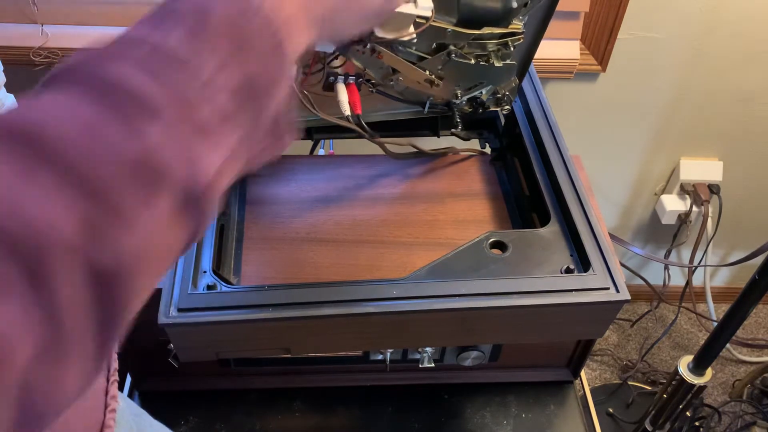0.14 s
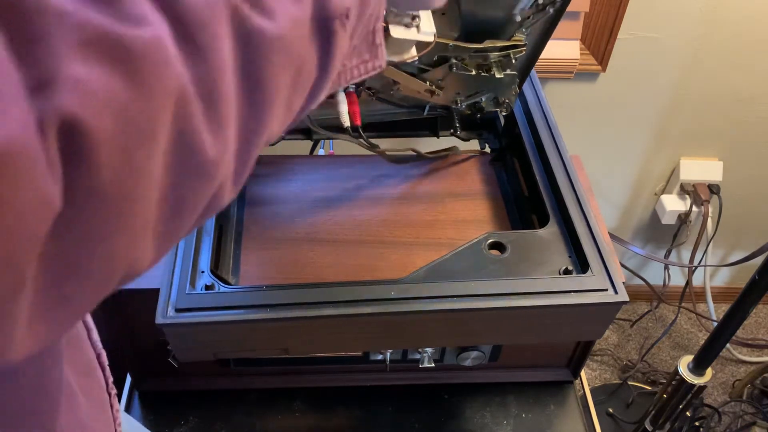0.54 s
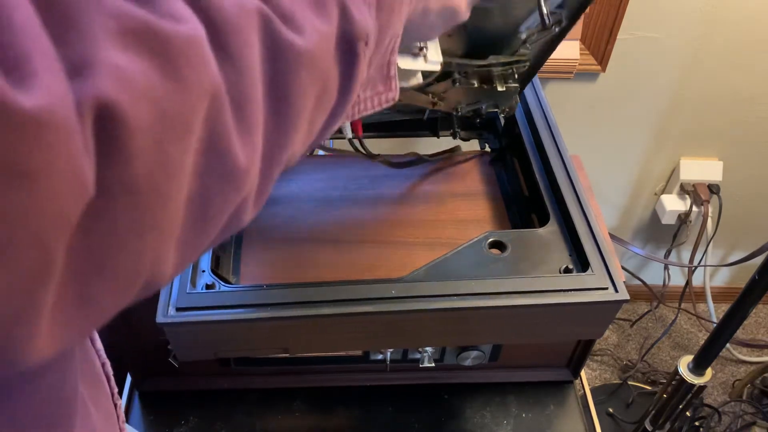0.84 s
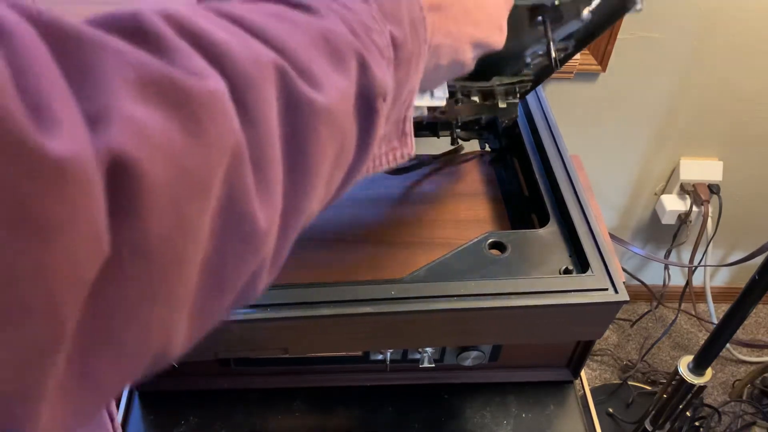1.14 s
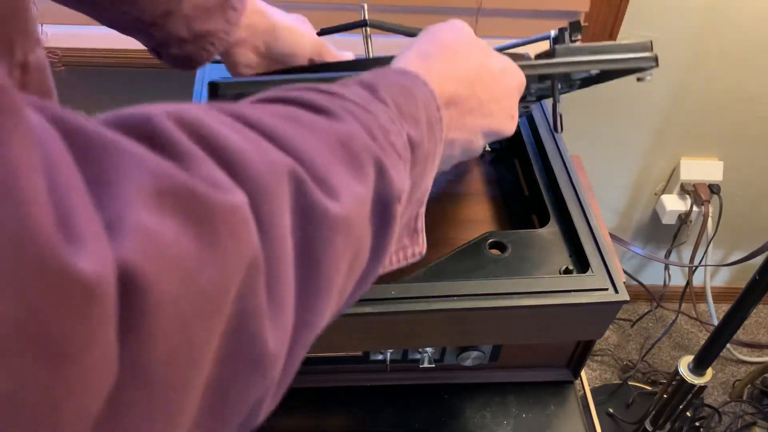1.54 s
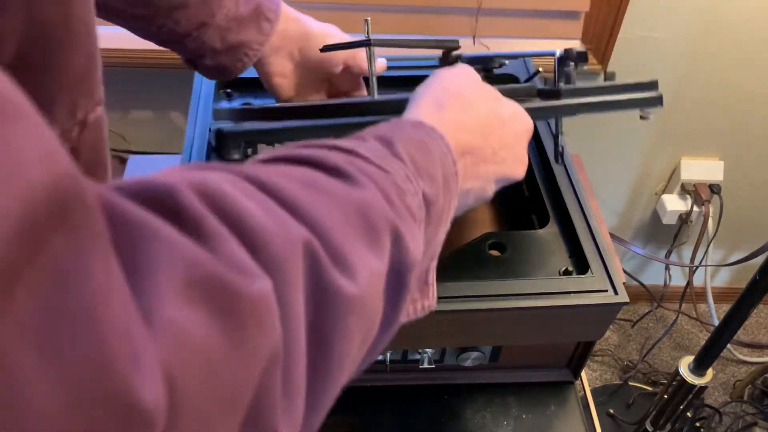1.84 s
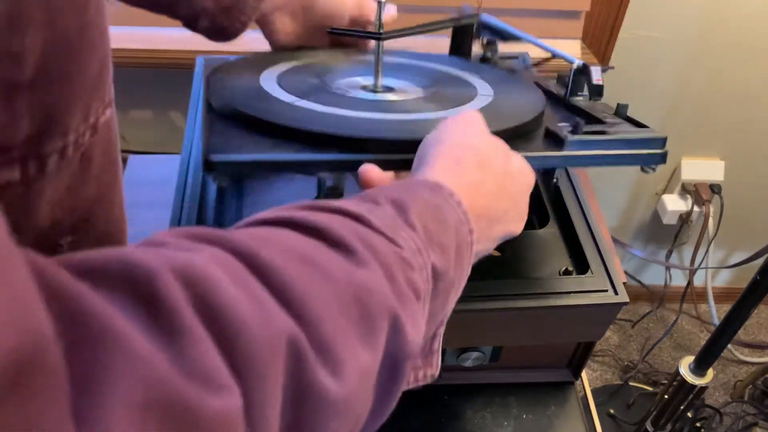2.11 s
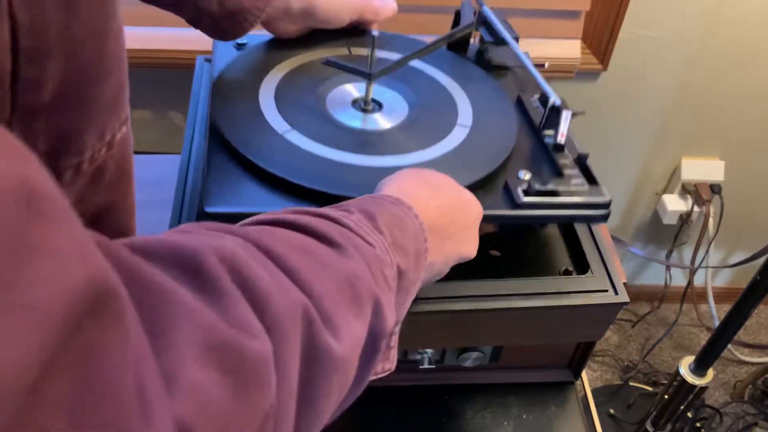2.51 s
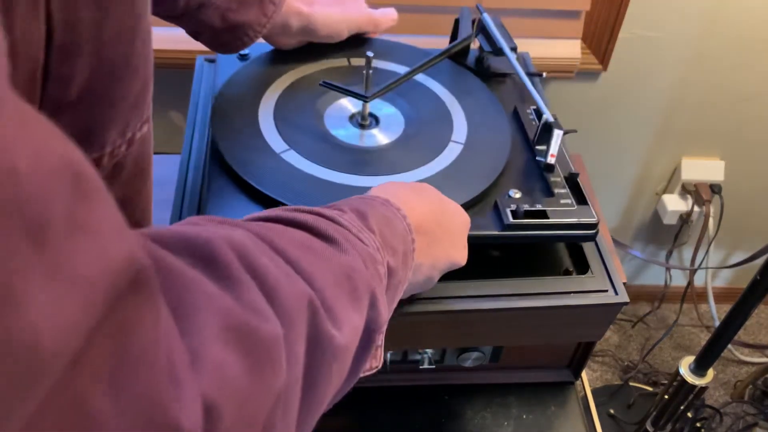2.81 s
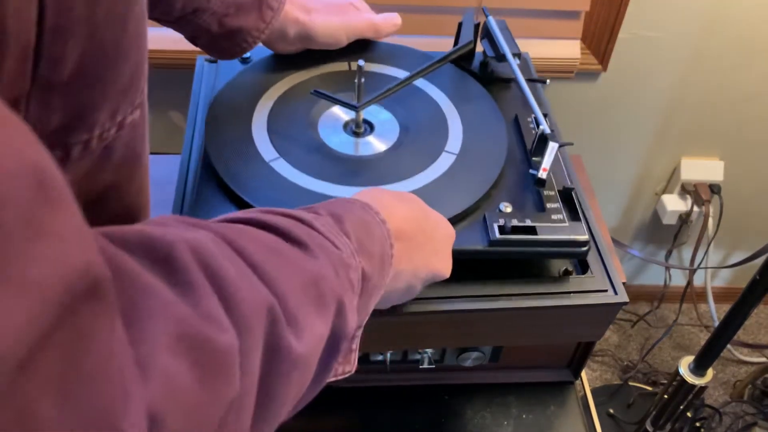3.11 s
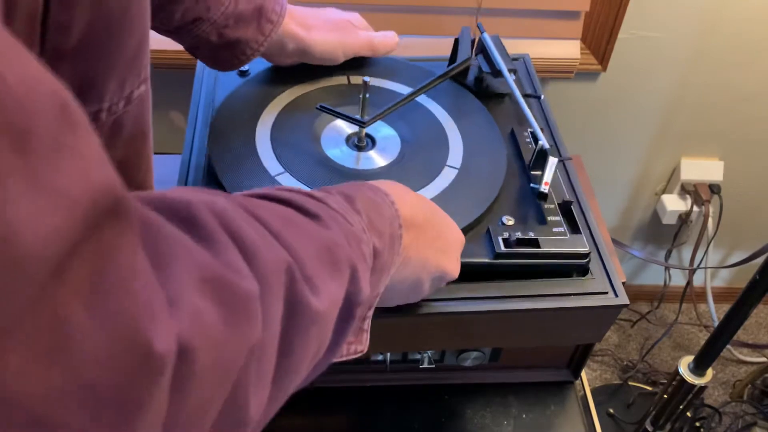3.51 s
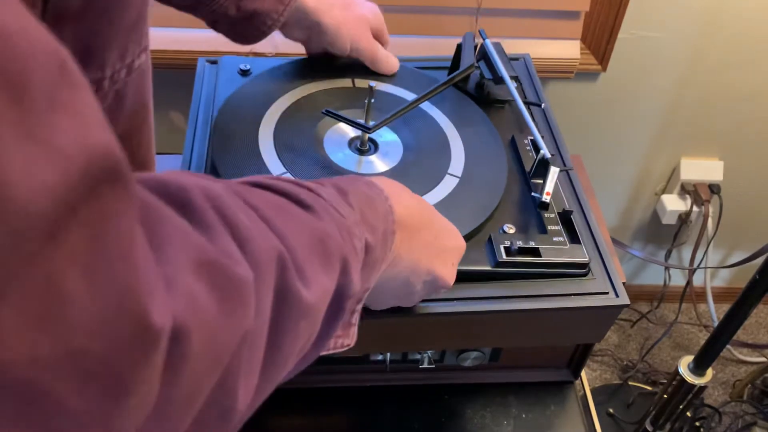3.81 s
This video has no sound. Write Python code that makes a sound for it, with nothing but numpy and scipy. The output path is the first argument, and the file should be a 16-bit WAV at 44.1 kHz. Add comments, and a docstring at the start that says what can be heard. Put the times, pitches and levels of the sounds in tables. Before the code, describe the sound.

A record player deck is handled close to the microphone: scattered clicks and rubs at first, a firm knock midway, then a dense run of clunks and scrapes as it settles into its wooden cabinet in a quiet room.

```python
"""A record player deck is turned over by hand and lowered into a wooden cabinet in a quiet room.
Throughout, filtered noise makes a low rumble and faint hiss, and a wavering sine makes mains hum.
From the start, loose parts click, the steel plate knocks and rings, and fingers and edges rub:
short blows and grainy noise set off fading tones of plate and cabinet, with a noisy hiss on top.
Near 2.4 s the deck comes down, which changes the offset between two close microphone ports."""
import sys
import numpy as np
from scipy import signal
from scipy.fft import rfft, irfft, next_fast_len
from scipy.io import wavfile
from scipy.ndimage import uniform_filter1d

SR = 44100
rng = np.random.default_rng(int(sys.argv[2]) if len(sys.argv) > 2 else 0)


def wav_record(signal):
    """Record a signal, one row per channel, as 16-bit PCM in the file named by sys.argv[1]."""
    frames = np.transpose(np.atleast_2d(signal))
    bounded = np.clip(frames, -1, 1)
    # unit amplitude maps onto the largest positive 16-bit level
    quanta = np.round(bounded * 32767).astype(np.int16)
    wavfile.write(sys.argv[1], SR, quanta)


def gain_from_db(level_db):
    """Convert decibel levels to linear amplitude factors (20 dB per decade)."""
    decades = np.asarray(level_db, float) / 20
    return 10 ** decades


N = 174195  # length in samples, just under 4 s

# Tones (modes) of the steel plate. Each row: pitch in Hz, relative level in dB, and the seconds
# to fade by 60 dB; each blow or rub shifts these a little and scales the fading time.
PLATE = [(718.7, -3, 0.27), (874, 5.5, 0.057), (1010, 2.5, 0.085), (1068, -3, 0.15), (1180, -0.5, 0.091),
         (1297, -3.5, 0.078), (1445, -8, 0.19), (1609, 0, 0.068), (1800, 3, 0.044), (2017, -2.5, 0.067),
         (2160, -17, 0.094), (2510, -1.5, 0.04), (2640, -6, 0.088), (2670, -34, 0.11), (3400, -10, 0.028)]
# Tones of the wooden cabinet, with the same columns and the same changes.
WOOD = [(174.5, 0, 0.22), (240, 1, 0.079), (295.7, -3.5, 0.063), (364, -2, 0.085), (426, -5, 0.11),
        (490.4, -3, 0.1), (558, -3, 0.056), (635, -1, 0.058)]
PLATE_PUSH_S, WOOD_PUSH_S = 0.0001, 0.00093  # how gradually each body starts to ring


def table(points, hz):
    """Reads a value from (Hz, value) points on a log-frequency axis."""
    p = np.array(points, float)
    return np.interp(np.log(np.maximum(hz, 1)), np.log(p[:, 0]), p[:, 1])


def shape(x, gain):
    """Filters by a gain that is a function of frequency."""
    size = next_fast_len(x.shape[-1])
    hz = np.arange(size // 2 + 1) * SR / size
    return irfft(rfft(x, size) * gain(hz), size)[..., :x.shape[-1]]


def unit(x):
    """Scales to rms 1."""
    return x / np.sqrt(np.mean(x ** 2))


def peak1(y):
    """Scales so that the loudest 4 ms have rms 1."""
    return y / np.sqrt(np.max(uniform_filter1d(y ** 2, size=180)))


def fade(t, t60):
    """Decays by 60 dB in t60 seconds."""
    return np.exp(-np.log(1000) * t / t60)


def walk(rate):
    """Makes a slow random drift with spread 1, from about `rate` random values a second."""
    k = int(SR / rate)
    steps = np.repeat(rng.standard_normal(N // k + 1), k)
    return unit(uniform_filter1d(uniform_filter1d(steps, k), k)[:N])


def background():
    """Room rumble falls off into faint hiss; a sine wavers in level and phase as mains hum."""
    # Colour of the rumble. Each row: frequency in Hz, relative level in dB.
    air_colour = [(15, -48), (25, -18.5), (69, -8), (160, -3), (399, -14.5), (567, -26), (666, -26),
                  (722, -27.5), (3530, -55), (9810, -55), (11500, -57.5), (13200, -55), (15500, -65)]
    # Left-right difference of the rumble. Each row: frequency in Hz, level against the middle in dB.
    air_width = [(60, -23), (110, -23.5), (200, -10), (380, -9.5), (700, 0), (1290, -6), (2380, 0),
                 (4400, 1), (8120, -1), (15000, -1.5)]
    air_db, hum_hz, hum_db = -51, 59.5, -55
    mid = shape(rng.standard_normal(N), lambda f: gain_from_db(table(air_colour, f)))
    side = shape(rng.standard_normal(N), lambda f: gain_from_db(table(air_colour, f) + table(air_width, f)))
    stereo = (mid + side * np.array([[1], [-1]])) / mid.std()
    air = stereo * gain_from_db(air_db + 1.0 * walk(0.57))
    cycle = 2 * np.pi * hum_hz * np.arange(N) / SR + .5 * walk(5.4)
    hum_level = gain_from_db(hum_db + 3 * walk(11))  # the hum wavers by 3 dB
    return air + hum_level * np.sqrt(2) * np.sin(cycle)


def room(x):
    """A furnished room adds a diffuse tail, shorter in the treble, alike left and right in the bass."""
    # How long the room rings. Each row: frequency in Hz, seconds to fade by 60 dB.
    ring_times = [(200, 0.67), (1000, 0.37), (3000, 0.4), (9000, 0.083)]
    # Likeness of the ports. Each row: frequency in Hz, share of the tail's power common to both.
    likeness = [(150, 1), (500, 0.31), (2000, 0.055), (8000, 0.13)]
    tail_db = -9.5
    t, tail = np.arange(SR // 2) / SR, 0
    for hz in 125 * 2. ** np.arange(8):  # one octave band after another
        octave = lambda f: np.exp(-2 * np.log2(np.maximum(f, 1) / hz) ** 2)
        band = shape(rng.standard_normal((3, len(t))), octave)
        alike = np.clip(table(likeness, hz), 0, 1)
        mixed = np.sqrt(alike) * band[0] + np.sqrt(1 - alike) * band[1:]
        tail = tail + mixed * fade(t, table(ring_times, hz))
    tail = tail * np.clip(t / 0.0013 - .3, 0, 1)  # silent for 0.4 ms, full after 1.7 ms
    return gain_from_db(tail_db) * signal.fftconvolve(x[None], tail / np.linalg.norm(tail[0]), axes=1)[:, :N]


def hiss_colour(f):
    """Treble colour of ticks and rubbing, with the narrow peaks and dips of small metal parts."""
    # Broad colour. Each row: frequency in Hz, relative level in dB.
    broad_colour = [(1470, -27), (2500, -5.5), (6110, -11), (7280, -8.5), (9080, -8), (10300, -13),
                    (11500, -12.5), (12200, -12.5), (13800, -26), (15500, -26)]
    # Resonances of the small parts. Each row: frequency in Hz, width in Hz, change in dB.
    small_parts = [(4140, 40, -12), (4640, 54, 0), (5080, 64, 0), (5200, 600, 6), (5700, 190, -2.5),
                   (8000, 150, 9.5), (9840, 210, 1)]
    resonances = sum(db * np.exp(-((f - hz) / width) ** 2) for hz, width, db in small_parts)
    return gain_from_db(table(broad_colour, f) + resonances)


def near_db(f, hz, reach_oct):
    """Modes far from the brightest one are excited less: 6 dB less at reach_oct octaves."""
    return -6 * (np.log2(np.maximum(f, 1) / hz) / reach_oct) ** 2


def ring(modes, t, extra_db, chance, push_s, held=0.8):
    """Damped modes after a push, each varied a little at random; held scales how long they ring."""
    scatter_db, detune = 2, .02  # random spread of each mode's level, and of its pitch as a share
    hz, db, t60 = np.array(modes, float).T[:, :, None]
    c = chance[:, :len(modes), None]
    level = gain_from_db(db + extra_db[:, None] + scatter_db * c[0])
    tone = np.sin(2 * np.pi * hz * (1 + detune * c[1]) * t + 9 * c[2])
    y = level * fade(t, t60 * held) * tone
    return peak1(y.sum(axis=0) * (1 - np.exp(-t / push_s)))


def rubs():
    """Grainy friction swells and fades, driving the modes of plate and cabinet, with a hiss on top."""
    # Rubbing strokes. Each row: start, strongest moment and end in seconds, plate level in dB,
    # wood and hiss levels against the plate in dB, brightest plate mode and brightest wood mode
    # in Hz, and taper (a small one gives firm edges).
    strokes = [(-.05, 0.017, 0.44, -68, 7.5, 1, 1330, 210, 0.52),
               (0.296, 0.342, 0.65, -55.5, -4.5, -37, 1160, 444, 2.2),
               (0.699, 0.801, 0.87, -57.5, -14, -14, 1350, 298, 1.17),
               (0.81, 0.879, 0.91, -53, -18, -14.5, 1180, 300, 0.56),
               (1.436, 1.456, 1.612, -53, 5, 2.5, 1800, 362, 0.74),
               (1.448, 1.496, 1.54, -46.5, 0.5, -15, 1010, 634, 0.29),
               (1.793, 1.851, 1.905, -55.5, 6, -12.5, 1540, 426, 0.85),
               (1.87, 1.911, 2.0, -63.5, 9.5, -17, 930, 440, 1.16),
               (2.176, 2.277, 2.544, -49.5, -13, -35, 1050, 440, 0.58),
               (2.194, 2.304, 2.654, -60, 7.5, -19, 1900, 376, 0.49),
               (2.529, 2.568, 2.71, -65.5, 16.5, -2.5, 1200, 288, 0.89),
               (3.127, 3.24, 3.36, -59.5, 10.5, -14, 1130, 180, 0.33),
               (3.333, 3.346, 3.418, -42.5, 2, 5.5, 1530, 443, 3.2),
               (3.28, 3.326, 3.42, -51, 1.5, -35, 1180, 443, 0.48),
               (3.415, 3.46, 4.9, -63.5, 8.5, -19, 1174, 294, 1.2),
               (3.524, 3.57, 3.65, -41.5, 4.5, -3.5, 1360, 460, 1.83),
               (3.6, 3.673, 3.74, -45, 0.5, -28, 930, 460, 1.05),
               (3.773, 3.813, 3.9, -50.5, 5, -18, 1270, 402, 1.9),
               (3.827, 3.858, 3.89, -38.5, 1.5, -13, 1160, 413, 0.48),
               (3.875, 3.875, 3.92, -45, 4.5, -36, 970, 225, 0.89)]
    plate_reach_oct, wood_reach_oct, broad_db = 0.63, 0.65, -6
    catch_per_s, catch_db, catch_spread_db = 400, 12.5, 3.5  # friction sticks, then slips
    t, out = np.arange(SR // 4) / SR, np.zeros(N + 2 * SR)
    grain = gain_from_db(2.5 * walk(150))  # roughness that wavers by 2.5 dB
    catch_level = gain_from_db(catch_db + catch_spread_db * rng.exponential(size=N).clip(0, 3))
    catches = (rng.random(N) < catch_per_s / SR) * catch_level
    grit = unit(grain * rng.standard_normal((2, N)) + catches)
    hiss = grain ** .5 * unit(shape(rng.standard_normal(N), hiss_colour))
    chance = rng.standard_normal((len(strokes), 2, 3, 16))
    for (start, top, end, db, wood_db, hiss_db, hz, wood_hz, taper), c in zip(strokes, chance):
        i, j = max(int(start * SR), 0), min(int(end * SR), N)
        peak = np.clip(top, start + .002, end - .002)
        swell = np.interp(np.arange(i, j) / SR, [start, peak, end], [0, 1, 0]) ** taper
        swell = gain_from_db(db) * swell
        plate_extra = near_db(np.array(PLATE)[:, 0], hz, plate_reach_oct)
        plate = ring(PLATE, t, plate_extra, c[0], PLATE_PUSH_S)
        # a band two octaves wide adds a less tonal response
        band = signal.butter(2, [hz / 2, hz * 2], "band", fs=SR, output="sos")
        broad = signal.sosfilt(band, t == 0)
        wood_extra = near_db(np.array(WOOD)[:, 0], wood_hz, wood_reach_oct)
        wood = ring(WOOD, t, wood_extra, c[1], WOOD_PUSH_S)
        parts = ((grit[0], plate, 0), (grit[0], broad, broad_db), (grit[1], wood, wood_db))
        for force, body, part_db in parts:
            y = signal.fftconvolve(force[i:j] * swell, body / np.linalg.norm(body))
            out[i:i + len(y)] += gain_from_db(part_db) * y
        out[i:j] += gain_from_db(hiss_db) * hiss[i:j] * swell
    return out[:N]


def knocks():
    """A contact of some milliseconds rings plate and cabinet, a buzz of dense modes and a bright tick."""
    # Knocks and clicks. Each row: time in seconds, plate level in dB, wood and tick levels against
    # the plate in dB, brightest plate mode and brightest wood mode in Hz, and ring length as a
    # multiple of the fading times in the mode tables.
    blows = [(.021, -45.5, -21, -19, 870, 252, 1.8), (.026, -35.5, -7, -38, 880, 262, 0.51),
             (.043, -40, -5, -32, 850, 203, 0.6), (0.215, -48.5, -4, -16, 900, 265, 1.5),
             (0.312, -63.5, 10, 3, 805, 234, .5), (0.351, -56.5, 6, -34, 970, 393, 1.1),
             (0.43, -54.5, -6, -29, 2060, 272, 0.69), (.605, -52.5, -2, -24, 1510, 250, 0.92),
             (.786, -37.5, -0.5, -28.5, 1010, 390, 0.89), (.8, -47.5, 11.5, -27, 1030, 265, .7),
             (0.833, -53, -10, -33, 1610, 298, 0.32), (.846, -49, -14, -23, 1050, 300, .5),
             (.866, -44.5, -22, -15.5, 880, 340, 1), (1.082, -57.5, -7, -2.5, 1010, 247, 1.85),
             (1.197, -46, -8, -26, 1250, 303, 0.73), (1.483, -40, -17, -13, 1280, 600, 0.51),
             (1.49, -46, 5.5, -23, 900, 643, 1.45), (1.744, -34.5, -24, -4, 1010, 600, 1.5),
             (1.747, -32.5, -11, -28, 990, 449, 1.3), (1.835, -55, -13, -25, 1910, 400, 1.1),
             (1.862, -52, -8, -25, 1290, 400, .7), (1.892, -47, 4, -50, 900, 273, 0.49),
             (2.104, -59.5, -3, -33, 1060, 267, 1.8), (2.148, -62.5, -2, -1, 930, 304, 2.6),
             (2.188, -49, -19, -29, 1060, 303, .8), (2.444, -44.5, 6, -41, 1150, 545, 0.69),
             (2.462, -54.5, 15.5, -30, 990, 287.6, 1.25), (2.573, -45.5, 0.5, 4.5, 1050, 426, 1.2),
             (2.647, -50, 5, -36, 990, 438, 0.77), (2.739, -29, -8.5, -36, 1046, 448, 0.97),
             (2.744, -38.5, -10, -46, 1880, 454, 0.66), (2.759, -47, -4, -31, 1500, 450, 0.47),
             (3.148, -33.5, -3, -5.5, 1390, 424, 0.61), (3.157, -32, -2.5, -38, 1113, 448, 0.89),
             (3.164, -41.5, 14, -36, 1180, 485, 0.81), (3.187, -53.5, 16, -30, 1180, 485, 2.2),
             (3.216, -34.5, -7, -13, 1500, 426, 0.69), (3.265, -33, -17, -20, 1100, 496, 0.38),
             (3.277, -46, 2, -43, 1110, 480, 1.5), (3.286, -43, -10, -32, 1020, 470, 0.72),
             (3.3, -42.5, 9, -23, 1060, 467, 0.68), (3.313, -43, -15, -17, 1020, 450, 1.1),
             (3.335, -34.5, -11, -17, 1120, 420, 1.2), (3.456, -49.5, 2, -38, 1280, 250, 0.9),
             (3.539, -42.5, 2, -24, 1130, 467, 1.34), (3.57, -43, -6, -22, 1180, 463, 2.1),
             (3.599, -40, 9.5, -24, 835, 500, 0.51), (3.614, -40.5, 11, -12.5, 744, 384, 0.8),
             (3.637, -50, 6, -25, 800, 400, 0.63), (3.661, -42, -1, -17, 840, 450, 0.75),
             (3.685, -41, -4, -32, 860, 404, 0.57), (3.77, -52.5, -12, -18.5, 1080, 264, 1),
             (3.841, -37, -5, -21, 1050, 400, .8), (3.867, -28, -1.5, -13, 1080, 410, 0.69),
             (3.874, -33.5, -17, -29, 1220, 400, 0.8), (3.894, -38, -8, -44, 840, 250, 0.53),
             (3.921, -56, 14.5, -30, 900, 430, 1.24)]
    contact_s, lead = 0.002004, 1.215  # a contact starts `lead` contact times before its row
    plate_reach_oct, wood_reach_oct, buzz_reach_oct = 0.33, 0.22, 1.01
    buzz_db, buzz_t60_s, tick_t60_s = -7, 0.11, 0.037
    out, t = np.zeros(N + SR), np.arange(SR // 3) / SR
    chance = rng.standard_normal((len(blows), 2, 3, 16))
    hiss = unit(shape(rng.standard_normal(N + SR), hiss_colour))
    white = rng.standard_normal(N + SR)
    rise = 1 - np.exp(-(t / contact_s) ** 2)
    for (s, db, wood_db, tick_db, hz, wood_hz, held), c in zip(blows, chance):
        i = int((s - lead * contact_s) * SR)
        plate_extra = near_db(np.array(PLATE)[:, 0], hz, plate_reach_oct)
        plate = ring(PLATE, t, plate_extra, c[0], PLATE_PUSH_S, held)
        buzz_noise = shape(white[i:i + len(t)], lambda f: gain_from_db(near_db(f, hz, buzz_reach_oct)))
        buzz = unit(buzz_noise) * fade(t, buzz_t60_s * held)
        # the longer a blow rings, the fewer wood modes it excites
        wood_extra = near_db(np.array(WOOD)[:, 0], wood_hz, wood_reach_oct / held ** 2)
        wood = ring(WOOD, t, wood_extra, c[1], WOOD_PUSH_S, held)
        tick = hiss[i:i + len(t)] * fade(t, tick_t60_s)
        metal = peak1(rise * (plate + gain_from_db(buzz_db) * buzz))
        cabinet = peak1(rise * wood)
        click = peak1(rise * tick)
        out[i:i + len(t)] += gain_from_db(db) * (metal + gain_from_db(wood_db) * cabinet + gain_from_db(tick_db) * click)
    return out[:N] * gain_from_db(1.0 * walk(200))  # the level of all knocks wavers at random by 1 dB


def ports(both, tilt, phase, top_db):
    """The two microphone ports hear one deck position with opposite level and phase offsets."""
    top_hz = 11600  # above this the highest treble is changed by top_db

    def port(sign):
        def gain(f):
            treble_db = top_db / (1 + (top_hz / np.maximum(f, 1)) ** 12)
            level = gain_from_db(sign * table(tilt, f) / 2 + treble_db)
            return level * np.exp(.5j * sign * table(phase[1:], f))
        return gain
    # the left port takes 0.84 of its half of the offset, the right port 0.98
    return np.array([shape(both[0], port(0.84)), shape(both[1], port(-0.98))])


def scene():
    """The phase and level offset between the ports changes as the deck comes down; background joins."""
    # Start and end of the lowering, in seconds.
    lowering_s = [2.35, 2.5]
    # The next three hold one entry for the deck held up, then one for the deck lowered.
    # Level offset, before the port shares. Each row: frequency in Hz, left minus right in dB.
    port_tilts = [
        [(60, -6), (110, -8), (200, -4.5), (380, -4.5), (700, 3), (1290, -1.5), (2380, 0), (4400, -2.5),
         (8120, 0.5), (15000, 0.5)],
        [(60, -11), (110, 10), (200, -4.5), (380, -1), (700, 3), (1290, -2.5), (2380, -0.5), (4400, -4),
         (8120, -0.5), (15000, 1)],
    ]
    # Phase offset, before the port shares. Each row: frequency in Hz, radians by which left leads;
    # the first row of each position is skipped.
    port_phases = [
        [(0, 0), (1210, 0.5), (1890, 0.23), (3450, 2.5), (4570, 0.95), (6200, 6), (7240, 3.0), (8530, 1.84),
         (10200, -1), (11100, -3), (12300, -4.5), (13200, -3), (15000, -23), (15200, 2)],
        [(0, 0), (1980, -0.0), (2670, 1.23), (3190, 1), (3700, 2), (4740, 0.5), (5170, 2), (8870, -6.5),
         (10200, -5.5), (11100, -12), (12300, -15.5), (13200, -30), (14700, -28), (15200, 8)],
    ]
    # Change of the highest treble, in dB.
    top_levels = [7, -3.5]
    deck = knocks() + rubs()
    both = deck + room(deck)
    down = np.interp(np.arange(N) / SR, lowering_s, [0, 1])
    air_tilt_db = -1  # background, left minus right
    out = background() * gain_from_db(air_tilt_db * np.array([[.5], [-.5]]))
    positions = zip((1 - down, down), port_tilts, port_phases, top_levels)
    for share, tilt, phase, top_db in positions:
        out = out + ports(both * share, tilt, phase, top_db)
    return out


def top_cut(x):
    """Nothing passes above the cut-off."""
    return signal.sosfilt(signal.butter(12, 15710, fs=SR, output="sos"), x)


def record(dry):
    """Two treble bands are weakened: a slight dip near 7.2 kHz and a deep hole near 11.7 kHz."""
    # Each row: frequency in Hz, width in Hz, change in dB.
    treble_dips = [(7220, 200, -4), (11680, 530, -22)]

    def dip_gain(f):
        return gain_from_db(sum(db * np.exp(-((f - hz) / width) ** 2) for hz, width, db in treble_dips))
    mix = shape(dry, dip_gain)
    return top_cut(mix)


dry = scene()
out = record(dry)
wav_record(out)
```